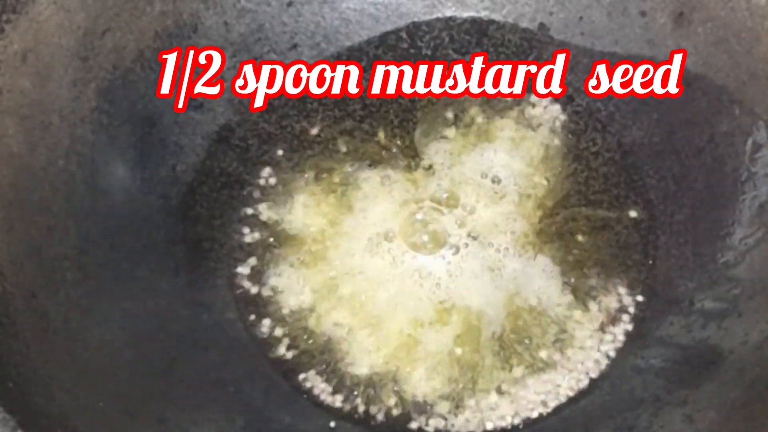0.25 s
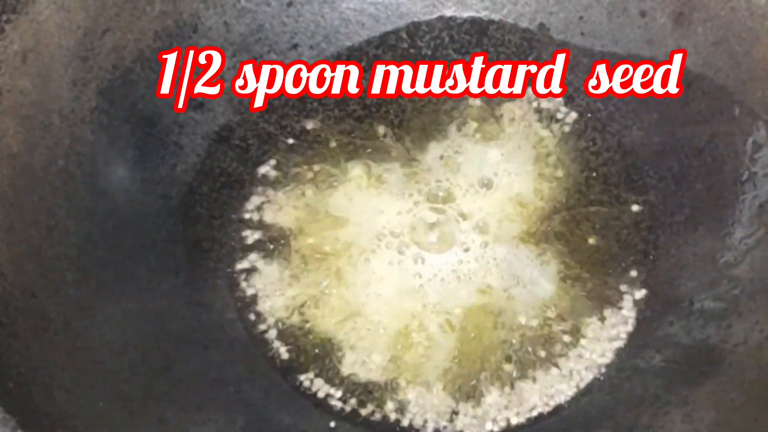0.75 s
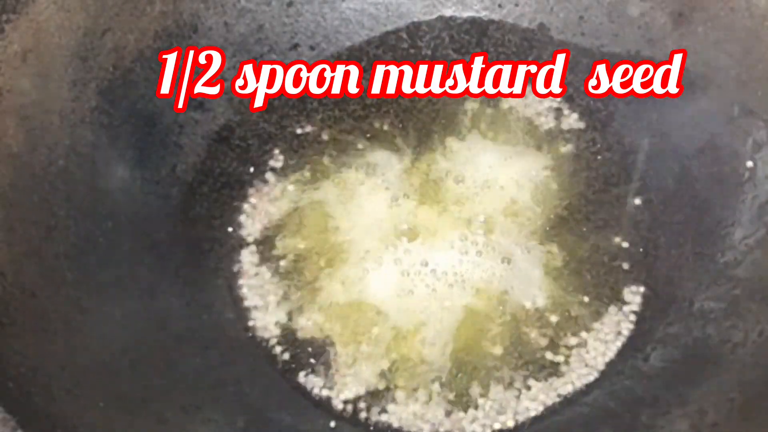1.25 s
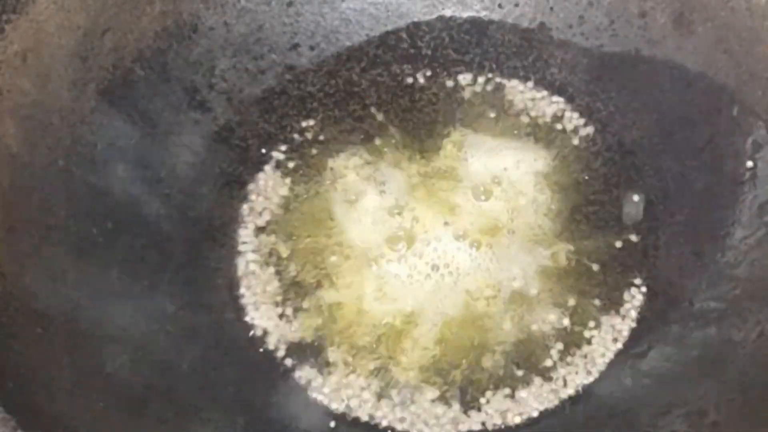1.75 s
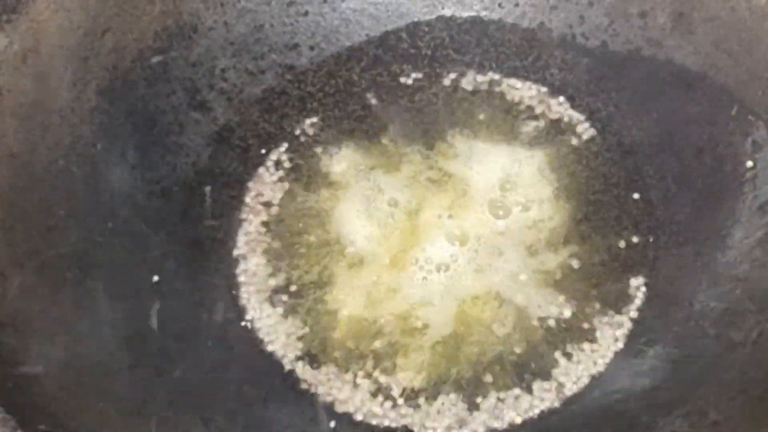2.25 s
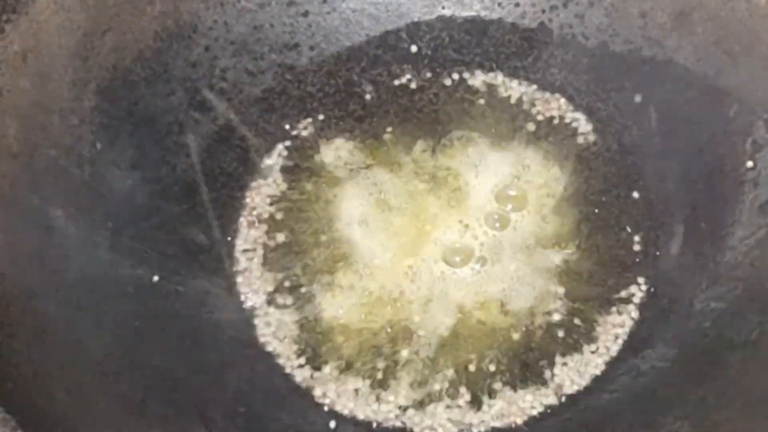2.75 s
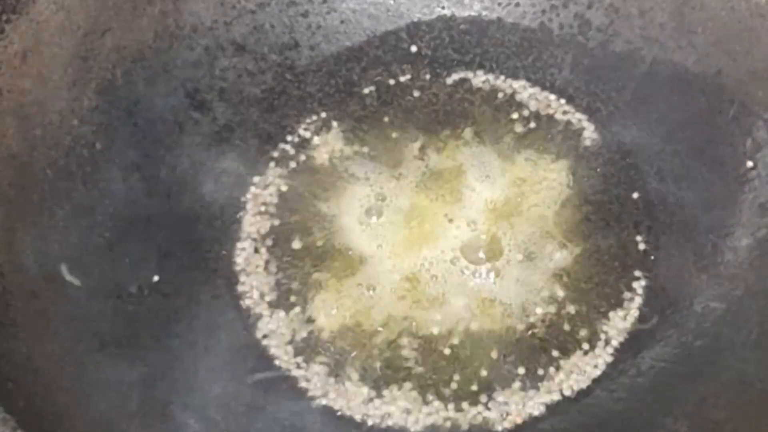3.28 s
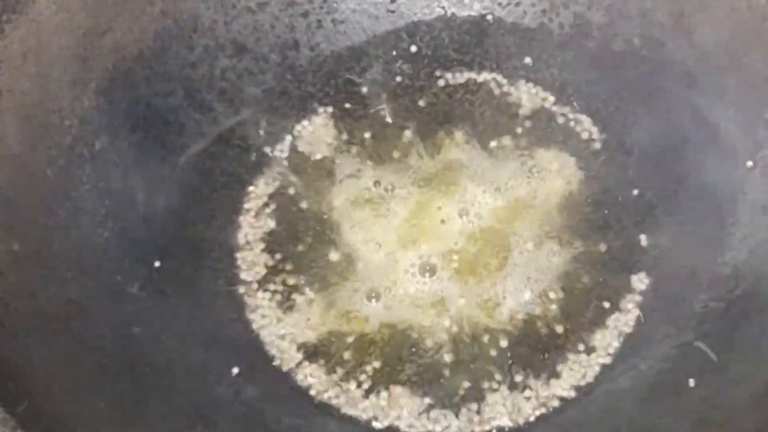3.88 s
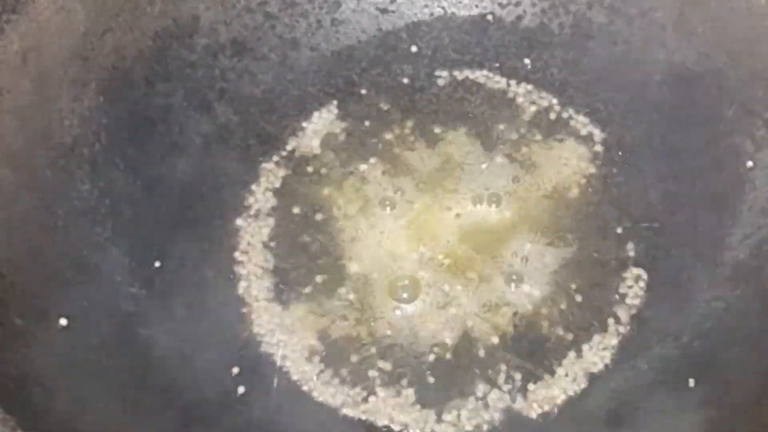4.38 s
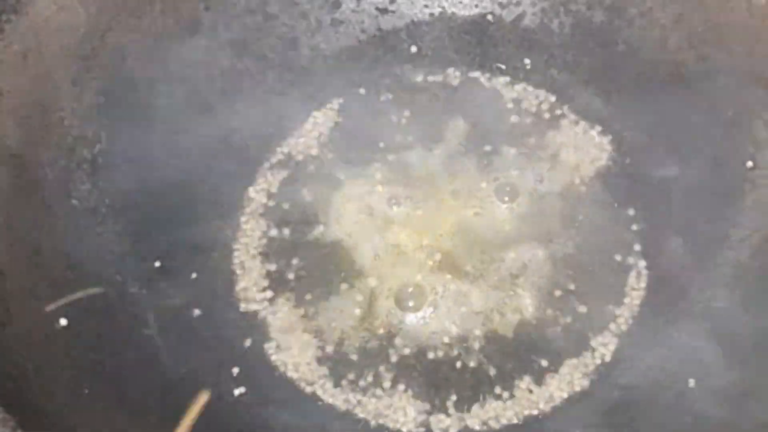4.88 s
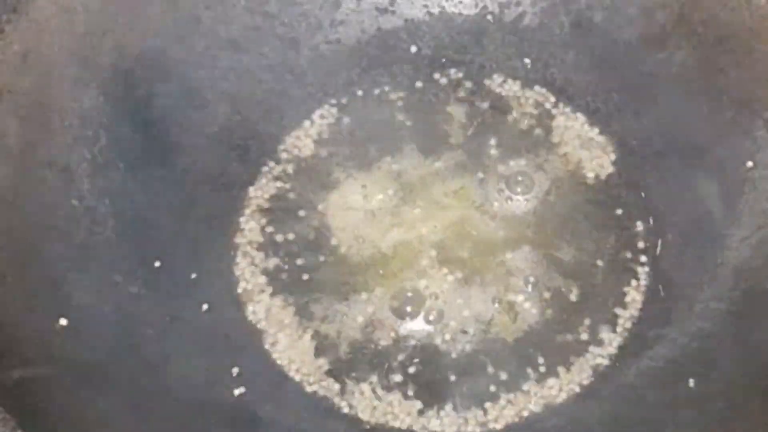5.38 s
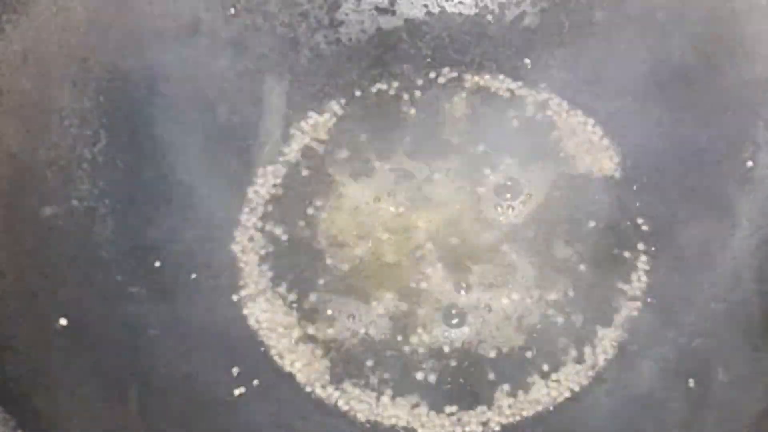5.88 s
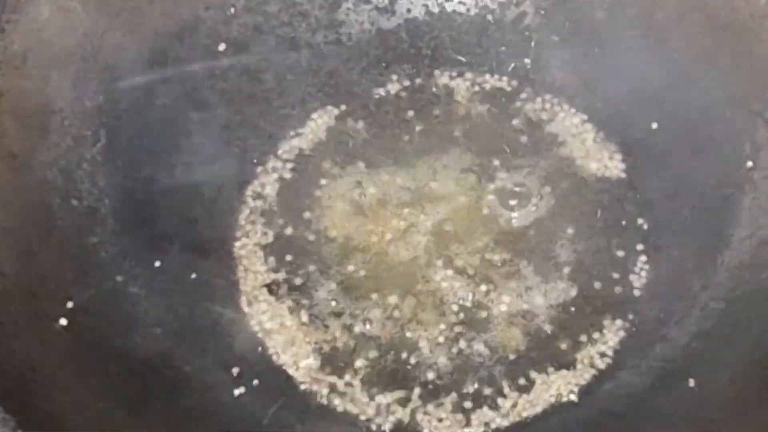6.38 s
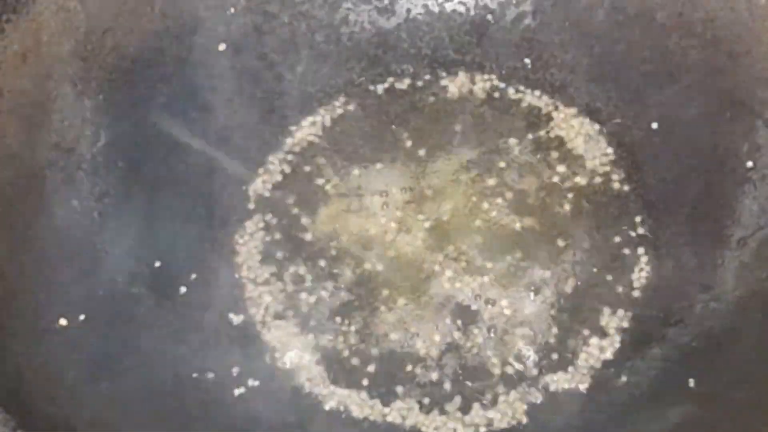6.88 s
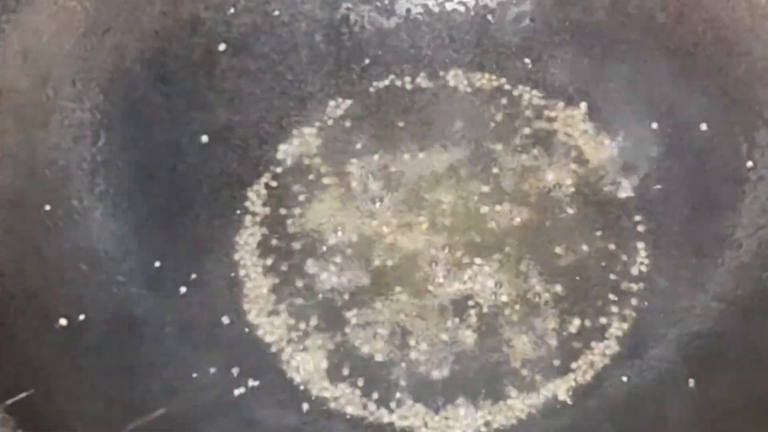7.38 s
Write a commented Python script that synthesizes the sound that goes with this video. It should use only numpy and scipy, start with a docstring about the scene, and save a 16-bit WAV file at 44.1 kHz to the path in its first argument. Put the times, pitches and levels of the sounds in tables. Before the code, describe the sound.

Close, dry seed pops build from a few snaps to rapid crackling in a sizzling steel wok, with a flame rumbling and a cricket trilling.

```python
"""Mustard seeds bursting in hot oil

Over a rumbling gas flame, shaped noise seethes in a steel wok; first a few dull resonant bubbles are heard,
then a dense sharp crackle: every seed is a ragged pulse with a thud, an echo off the wok and a short spray.
A few flying drops tap the microphone as decaying pulses with a slow swing. Behind it a cricket, pulsed
narrow-band noise, trills without a pause, and the cookware is knocked lightly twice, ringing as damped modes."""
import sys
import numpy as np
from scipy import signal
from scipy.fft import rfft, irfft, next_fast_len
from scipy.io import wavfile
from scipy.ndimage import uniform_filter1d

SR = 44100
rng = np.random.default_rng(int(sys.argv[2]) if len(sys.argv) > 2 else 0)


def dump_mix(stems):
    """Bounce the given channels to the path in sys.argv[1] as a 16-bit WAV at rate SR."""
    frames = np.atleast_2d(stems).T  # one column per channel
    limited = np.clip(frames, -1, 1)  # hard clip at full scale
    pcm = np.round(limited * 32767).astype(np.int16)
    wavfile.write(sys.argv[1], SR, pcm)


N = 336906
TIME = np.arange(N) / SR


def from_db(db):
    """Level law: decibels to amplitude gain."""
    return 10 ** (np.asarray(db) / 20)


def rms_one(x):
    """Normalisation of power: scale to rms 1."""
    return x / np.sqrt(np.mean(x ** 2) + 1e-20)


def curve(rows):
    """Linear interpolation of a (t/s, value) table at every sample."""
    s, values = np.transpose(rows)
    return np.interp(TIME, s, values)


def at_hz(points, hz):
    """Interpolation of a (f/Hz, value) table on a log-frequency axis."""
    point_hz, values = np.transpose(points)
    return np.interp(np.log(hz + 1), np.log(point_hz), values)


def add(out, s, sound):
    """Superposition: mix a sound in at time s."""
    i = max(round(s * SR), 0)
    out[..., i:i + sound.shape[-1]] += sound[..., :max(N - i, 0)]


def seconds(length_s_divisor):
    """Time axis of a short event lasting 1 / divisor s."""
    return np.arange(SR // length_s_divisor) / SR


def pan(left_db):
    """Intensity stereophony: two channel gains at equal power, the left stronger by left_db."""
    return rms_one(from_db([[left_db / 2], [-left_db / 2]]))


def drift(rate_hz):
    """Low-pass noise: slow chance fluctuation with spread 1, drawn at every 40th sample."""
    r = np.exp(-80 * np.pi * rate_hz / SR)
    white = rng.standard_normal(N // 40 + 2002)
    slow = signal.lfilter([1], [1, -2 * r, r * r], white)[2000:]   # skip the filter's start
    return np.interp(np.arange(N) / 40, np.arange(len(slow)), rms_one(slow))


def colour(x, spectrum):
    """Minimum-phase filtering: a causal response with the given spectrum, found by folding the cepstrum."""
    size = next_fast_len(N + SR // 2, real=True) // 2 * 2
    gain = from_db(at_hz(spectrum, np.fft.rfftfreq(size, 1 / SR)))
    cepstrum = irfft(np.log(gain), size)
    cepstrum[1:size // 2] *= 2
    cepstrum[size // 2 + 1:] = 0
    return irfft(rfft(x, size) * np.exp(rfft(cepstrum)), size)[..., :N]


# correlation of the two channels in the steady sounds: f/Hz, correlation (-1 to 1)
CHANNEL_CORRELATION = [(60, 0.75), (130, 0.94), (290, 0.81), (640, 0.32), (1400, -0.56), (3100, 0.33),
                       (7000, 0.057)]


def noise(spectrum):
    """Partial coherence: stereo noise of rms 1, mixed from mid and side to the correlation of each pitch."""
    size = next_fast_len(N, real=True)
    hz = np.fft.rfftfreq(size, 1 / SR)
    mid, side = rfft(rng.standard_normal((2, size)))
    alike = np.clip(at_hz(CHANNEL_CORRELATION, hz), -1, 1)
    both = np.sqrt(1 + alike) * mid + np.sqrt(1 - alike) * side * [[1], [-1]]
    # soft skirts beyond the ends of the table
    upper_skirt = 1 / (1 + (hz / spectrum[-1][0] / 1.2) ** 6)
    lower_skirt = 1 / (1 + (spectrum[0][0] / 1.2 / (hz + 1)) ** 6)
    shape = upper_skirt * lower_skirt * from_db(at_hz(spectrum, hz))
    return rms_one(irfft(both * shape, size)[:, :N])


def resonate(x, hz, q):
    """Second-order resonance with gain 1 on top."""
    w = 2 * np.pi * min(hz, SR / 3) / SR
    a = np.sin(w) / (2 * q)
    return signal.lfilter([a, 0, -a], [1 + a, -2 * np.cos(w), 1 - a], x)


def low_pass(x, hz):
    """Second-order low-pass, kept below the Nyquist frequency."""
    return signal.lfilter(*signal.butter(2, min(hz, SR * .45), fs=SR), x)


def unit_energy(x):
    """Normalisation of energy: scale a stereo event to a mean channel energy of 1."""
    return x / np.sqrt(np.sum(x ** 2) / 2)


def dying(t, first_s, linger_db, linger_s):
    """Double-slope decay: a quick one followed by the fainter, longer one of the kitchen."""
    return np.sqrt(np.exp(-2 * t / first_s) + from_db(2 * linger_db) * np.exp(-2 * t / linger_s))


def snap(t, snap_s=0.00011, scatter_db=-8.0, scatter_s=0.0018, own=0.8):
    """Impulsive source: a short ragged pressure pulse, later at the right port, then scattering in the bowl."""
    white = rng.standard_normal((5, len(t)))
    shell = (white[0] + own * white[1:3]) * np.exp(-t / snap_s)   # own: share private to each channel
    shell[:, 0] += 1.5   # the husk splits at once
    shell[1] = np.roll(shell[1], shift=2)
    scatter = white[3:] * np.exp(-t / scatter_s) / np.sqrt(scatter_s * SR / 2)
    return shell / np.linalg.norm(shell, axis=1, keepdims=True) + from_db(scatter_db) * scatter


def burst(x, hz, q=1.0, crack_db=-20.0, reach=2.32):
    """Broad resonance around the pitch; the top treble grows as the fourth power of pitch. Energy 1."""
    body = low_pass(resonate(x, hz, q * np.sqrt(4000 / hz)), reach * hz)
    crack = from_db(crack_db) * (hz / 8000) ** 4 * resonate(x, 14000, 0.62)
    return unit_energy(body + crack)


# spectrum of the flame's rumble: f/Hz, relative level/dB per Hz
FLAME_SPECTRUM = [(20, -12), (32, -10), (45, -8.5), (60, -5), (85, -3), (100, 3.5), (122, -1), (143, 3.5),
                  (170, -11.5), (205, -11.5), (237, -7), (280, -15.5), (325, -11.5), (370, -18.5),
                  (450, -22.5), (620, -23.5)]
# boom of the gas flame under the wok: t/s, level/dB
BOOM_LEVEL = [(0,-34),(.28,-51),(.9,-50),(1.1,-41.5),(2.3,-42.5),(2.72,-39.5),(2.85,-32),(2.98,-47),(3.8,-49.5),(4.09,-36.5),(4.3,-47),(5.4,-45.5),(5.6,-36.5),(5.75,-50),(6.4,-43),(7.13,-51),(7.43,-36.5),(7.62,-55)]
# rumble of the gas flame, before the common rumble gain: t/s, level/dB
RUMBLE_LEVEL = [(0,-41),(.85,-41),(1.3,-38.5),(2.7,-40.5),(3.08,-40),(3.45,-45.5),(3.8,-46),(4.28,-43),(4.4,-45.5),(7.05,-47.5),(7.64,-44.5)]


def flame(rumble_db=1.0, boom_hz=73, boom_q=8.3):
    """Turbulence noise, and a cavity resonance that swells and sinks in the gap under the wok."""
    rumble = from_db(curve(RUMBLE_LEVEL) + rumble_db) * noise(FLAME_SPECTRUM)
    swing = resonate(rng.standard_normal(N), boom_hz, boom_q)
    swing = rms_one(resonate(swing, boom_hz, boom_q / 3))
    power = uniform_filter1d(swing ** 2, size=SR // 8)
    boom = swing / np.sqrt(power + .05)   # evens out the chance swells
    return (rumble + from_db(curve(BOOM_LEVEL)) * boom) * pan(1.2)


# pulse rate of the cricket: t/s, rate/(pulses per s)
TRILL_RATE = [(0, 12.85), (.6, 13.2), (1.1, 12.7), (1.6, 12.5), (2.2, 13.3), (3.1, 12.9), (3.9, 13.42),
              (5, 13.2), (6, 13.3), (6.8, 13.5), (7.6, 12.75)]
# narrow band of the cricket: f/Hz, relative level/dB per Hz
CRICKET_SPECTRUM = [(6000, -32), (6850, -22.5), (7200, -2), (7410, -0.5), (7580, 6.5), (7760, -4),
                    (8050, -12), (8900, -42)]


def cricket(level_db=-39.5, depth_db=5.0):
    """Amplitude modulation: a high pulsed trill of uneven strength, smeared by the walls into a narrow band."""
    turns = np.cumsum(curve(TRILL_RATE)) / SR - .45
    uneven_db = .9 * drift(6)
    pulse_db = depth_db * np.cos(2 * np.pi * turns)
    return from_db(level_db + uneven_db + pulse_db) * noise(CRICKET_SPECTRUM) * pan(-0.8)


def crackle(per_s, spread_db):
    """Poisson-like impulse noise: countless tiny bubbles collapse at random; rms 1."""
    sizes = from_db(spread_db * np.minimum(rng.exponential(1, N), 4))
    happens = rng.random(N) < per_s / SR
    return rms_one(sizes * happens * rng.standard_normal((2, N)))


# colours of the frying oil, middle range and top: f/Hz, relative level/dB per Hz
SEETHE_SPECTRUM = [(250, -11), (450, 5.5), (800, 7.5), (1400, 6.5), (2200, 4.5), (3400, -6), (5500, -17.5),
                   (9000, -20)]
FIZZ_SPECTRUM = [(1500, -5), (3300, 1), (5200, 0.5), (7000, 1), (9500, -12), (12000, -1), (14500, -1),
                 (16000, -3)]
# strength of the seething and of the fizz, before the random flicker: t/s, level/dB
SEETHE_LEVEL = [(0,-53.5),(1.1,-51.5),(2,-48.5),(2.35,-52),(2.65,-47.5),(3.3,-56),(3.8,-52.5),(4.1,-46),(4.7,-44.5),(5.1,-50),(6.3,-55.5),(7.3,-64),(7.64,-55.5)]
FIZZ_LEVEL = [(0,-53),(.7,-57.5),(1.1,-53),(2.6,-51),(3.3,-52),(3.8,-50.5),(4.15,-46.5),(4.65,-44.5),(5.35,-50),(6.3,-47.5),(6.65,-53),(7.1,-53.5),(7.64,-51)]


def oil():
    """Summed random collapses: the foam seethes in the middle and fizzes on top, partly as single grains."""
    seethe_grains = rms_one(colour(crackle(900, 2.4), SEETHE_SPECTRUM))
    fizz_grains = rms_one(colour(crackle(500, 3.9), FIZZ_SPECTRUM))
    seethe = noise(SEETHE_SPECTRUM) + from_db(-9.5) * seethe_grains
    fizz = noise(FIZZ_SPECTRUM) + from_db(-6.5) * fizz_grains
    flicker_db = drift(14)   # shared by both
    seethe *= from_db(curve(SEETHE_LEVEL) + flicker_db) * pan(3.5)
    fizz *= from_db(curve(FIZZ_LEVEL) + flicker_db) * pan(1.5)
    return seethe + fizz


# steam squeezing out of the foam: middle t/s, half length/s, f/Hz, level/dB
STEAM_SPURTS = [(0.11, 0.089, 2830, -48.5), (0.366, 0.019, 2850, -50), (.68, 0.091, 675, -54.5),
                (1.3, 0.4, 1175, -57.5), (1.6, 0.11, 1010, -49), (1.815, 0.033, 1850, -48),
                (1.05, .025, 4600, -49), (2.102, 0.1, 1080, -58), (5.469, 0.013, 3350, -35.5),
                (7.537, 0.013, 3700, -30)]


def spurts(q=5.9):
    """Resonant jet noise: soft, narrow hisses under a Gaussian swell."""
    out, t = np.zeros((2, N)), seconds(2)
    for s, half_s, hz, level_db in STEAM_SPURTS:
        start = max(s - .25, 0)
        hiss = resonate(rng.standard_normal((2, len(t))), hz, q)
        hiss = rms_one(resonate(hiss, hz, q / 2))
        swell = np.exp(-((t + start - s) / half_s) ** 2)
        add(out, start, from_db(level_db) * hiss * swell)
    return out * pan(6.0)


def ticks(level_db=-10.0, spread_db=2.5, hz=6500):
    """Random thinning: faint ticks of tiny bubbles and droplets, more frequent and louder with harder fizz."""
    out, t = np.zeros((2, N)), seconds(100)
    fizz_re_db = curve(FIZZ_LEVEL) + 48   # relative to -48 dB
    for when, keep, size, pitch, side in rng.random((420, 5)):
        heat_db = fizz_re_db[int(when * N)]
        if keep < .6 * from_db(heat_db):
            gain = from_db(level_db + 2.2 * heat_db + spread_db * 2 * (size - 2.5))
            tick = burst(snap(t), hz * 2 ** (pitch - .5))   # within half an octave either way
            add(out, when * N / SR, gain * tick * pan(10 * side))
    return out


# modes of the cookware: f/Hz, relative level/dB, t60/s
COOKWARE_MODES = [(105, -8.5, .15), (234, -1, 0.35), (300, -9, 0.17), (356, -13, 0.088), (426, -3, 0.19),
                  (505, -5, .1), (608, -5.5, 0.15), (724, -18, 0.11), (816, -0.5, 0.25), (910, -10, .1),
                  (1066, -5, 0.088), (1260, -13, .07)]
# knocks on the cookware: t/s, relative level/dB, pitch stressed most f/Hz
COOKWARE_KNOCKS = [(5.548, -37, 690), (5.561, -35, 597), (5.574, -38.5, 300), (5.587, -40.5, 200),
                   (6.325, -43, 800), (6.347, -38, 800)]


def knocks(focus_db=3.5):
    """Modal excitation: soft knocks rattle the cookware and ring its modes, most those near the stressed pitch."""
    out, t = np.zeros((2, N)), seconds(2)
    for s, level_db, stress_hz in COOKWARE_KNOCKS:
        rattle = rms_one(resonate(rng.standard_normal((2, len(t))), stress_hz, 0.82))
        add(out, s, from_db(level_db) * rattle * np.exp(-t / 0.022))
        for hz, mode_db, t60 in COOKWARE_MODES:
            away_db = focus_db * np.log2(hz / stress_hz) ** 2   # loss by distance in octaves
            tone = np.sin(2 * np.pi * hz * t + rng.normal(0, 1.0, (2, 1)))
            envelope = np.exp(-np.log(1000) * t / t60) * (1 - np.exp(-t / 0.0008))
            add(out, s, from_db(level_db + mode_db - away_db) * tone * envelope)
    return out * pan(2.4)


# large steam bubbles in the foam: t/s, relative level/dB, lower pitch f/Hz
STEAM_BUBBLES = [(0.46,-14.5,3020),(.514,-4.5,2980),(0.836,-7,3000),(1.041,-10,3250),(1.0782,-11.5,2600),(1.3385,-4,2230),(1.431,-11.5,3000),(1.45,-13.5,3860),(1.744,-8,1880),(1.805,-12.5,1900),(1.9057,-2,2400),(2.14,-12.5,2920),(2.1759,-11,3340),(2.2923,-6,1800),(2.511,-9.5,2670),(2.6956,-.5,1650),(3.0184,-12.5,3070)]


def bubbles(level_db=1.5, second_db=1.0, tick_db=-7.5, room_db=-27.5, muffle_hz=10000, second_ratio=1.32):
    """Bubble resonance: a large bubble rings for a few cycles at two pitches, and the kitchen answers."""
    out, t = np.zeros((2, N)), seconds(6)
    q = 7.5
    for s, size_db, hz in STEAM_BUBBLES:
        second_hz = second_ratio * hz
        answer = rng.standard_normal((2, len(t))) * dying(t, first_s=0.015, linger_db=-22.0, linger_s=0.044)
        push = snap(t, snap_s=.00005, scatter_db=-8.5) + from_db(room_db) * answer
        ring = resonate(push, hz, q)
        ring -= from_db(second_db) * resonate(push, second_hz, q)
        ring += from_db(tick_db) * resonate(push, 5300, 0.37)
        ring = resonate(ring, np.sqrt(hz * second_hz), 0.63)
        ring = low_pass(ring, muffle_hz)   # the foam muffles the top
        add(out, s, from_db(size_db + level_db) * unit_energy(ring))
    return out * pan(5.3)


# oil drops landing on the microphone: t/s, relative tap level/dB
MICROPHONE_DROPS = [(5.225,-6),(5.815,-18),(5.843,-8),(5.9438,-16),(6.0337,-11),(6.3469,-16)]


def drops(tap_s=0.00011, swing_s=0.012, left_db=23.0, swing_hz=64.6, swing_db=-4.5, swing_growth=1.2):
    """Damped oscillation: a drop taps the left port and the diaphragm swings slowly, growing faster than the tap."""
    out, t = np.zeros(N), seconds(5)
    for s, tap_db in MICROPHONE_DROPS:
        tap = np.exp(-t / tap_s) - 0.27 * np.exp(-t / 0.0025)
        swing = np.sin(2 * np.pi * swing_hz * t) * np.exp(-t / swing_s)
        swing_gain = from_db(swing_db + swing_growth * tap_db)   # growth in dB per dB
        add(out, s, from_db(tap_db + 6.0) * tap + swing_gain * swing)
    return out * pan(left_db)


# heating of the oil: t/s, share of the full burst rate (0 to 1)
OIL_HEAT = [(1, .15), (2.2, 0.56), (4, 1)]


def small_pops(full_per_s=5, level_db=-8.5, spread_db=2.5, cool_db=-6, hz=7200, thud_db=-23, spray_db=-28.5):
    """Random thinning: lesser bursts, more frequent and stronger with heat; rows like those of SEED_POPS."""
    rows, chances_per_s = [], 20
    for when, keep, size, pitch in rng.random((chances_per_s * N // SR, 4)):
        s = when * N / SR
        heat = np.interp(s, *np.transpose(OIL_HEAT))
        if keep < heat * full_per_s / chances_per_s:
            pop_db = level_db + cool_db * (1 - heat) + spread_db * (2 * size - 1)
            rows.append((s, pop_db, hz * 2 ** (pitch - .5), thud_db, pop_db + spray_db))
    return rows


# the seeds that burst loudest:
# t/s, relative level/dB, f/Hz, thud re that level/dB, relative spray level/dB
SEED_POPS = [(.885,4,5900,-42.5,-31),(1.02,-5,4700,-27,-34),(1.041,-16,5160,-27,-38),(1.109,-9,5340,-16,-43),(1.2098,-13,7540,-23,-57),(1.7704,-7,5000,-22,-34),(1.8382,-6.5,5100,-11,-41),(2.3532,-13,5900,-22,-37),(2.4776,-7.5,6500,-18,-41),(2.5844,-3,5600,-14,-38),(2.5979,3,9800,-13.5,-24.5),
             (2.9196,10.5,9500,-29,-22.5),(2.9742,-1.5,8100,-16,-30.5),(3.026,-3,8900,-6.5,-23.5),(3.0674,-2,8200,-8.5,-26.5),(3.1469,-7,4750,-27,-36),(3.1583,-6,8600,-27,-40),(3.2248,-10,6200,-29,-42),(3.3959,-9,9700,-13,-33),(3.4343,6,7960,-19,-26.5),(3.5935,1,9500,-21,-27),(3.6493,8,7200,-36,-29),(3.7115,6.5,9700,-17,-21.5),(3.7558,2.5,6430,-8.5,-31),(3.8034,-5,6900,-15,-38),(3.8755,4,9000,-17,-23.5),(3.8865,4,10000,-18,-24.5),(3.9435,-2.5,8800,-29,-37),(3.995,3,10700,-13.5,-21),
             (4.0167,8.5,9300,-18,-22.5),(4.0864,2,7700,-8.5,-24),(4.1291,-1,6800,-0.5,-24.5),(4.1764,3,8800,-11.5,-21),(4.2206,-6,8800,-29,-19.5),(4.3183,.5,8750,-27,-23),(4.4176,6,8700,-28,-23),(4.5183,1,5800,-4,-25.5),(4.5794,11,8060,-22,-26),(4.6119,-1.5,6570,-16,-29),(4.6432,-3.5,7700,-29,-27),(4.7875,6,8250,-10,-22),(4.8042,-5,6800,-25,-27),(4.8232,9.5,9250,-10.5,-26),(4.9255,5.5,8900,-16,-24),(4.9475,13.5,6700,-17,-19.5),(4.9837,3,8300,-14,-32),
             (5.0169,-3,8900,-32,-30),(5.1078,1,7200,-31,-28),(5.154,2.5,8900,-21,-31),(5.1805,3,10300,-9.5,-21),(5.2251,-5,4400,-24,-30.5),(5.2688,13,7200,-19,-23),(5.3756,-3.5,8090,-24,-32),(5.382,7,8100,-33,-30),(5.44,8,8700,-25,-28),(5.4656,-3.5,4330,-19,-30.5),(5.4886,3,8600,-16,-28),(5.514,12.5,8300,-25,-21),(5.5666,-3,5740,-13,-29),(5.6851,-2,5470,-27,-29),(5.6996,6.5,9800,-12.5,-25.5),(5.7255,5,7100,-23,-27),(5.8033,3.5,9500,-23,-24),(5.815,8,8200,-17,-20.5),(5.8655,7.5,8300,-22,-27),(5.8898,8,7540,-34,-29),(5.9155,5,10360,-28,-29),(5.9442,8,8700,-8.5,-25),
             (6.0336,2,7500,-33,-25),(6.0545,-1,5930,-16,-27.5),(6.0711,3,8700,-21,-22.5),(6.118,-3.5,8300,-13,-29),(6.1758,-2.5,8900,-25,-32),(6.2484,9.5,9800,-13,-20.5),(6.2789,2.5,9600,-18,-24.5),(6.3455,6,6900,-8.5,-24),(6.4136,11,8100,-25,-25),(6.4532,1,5800,-16,-29),(6.4732,10.5,8700,-12.5,-22.5),(6.5578,-2,8100,-22,-27),(6.6508,5,9700,-34,-44),(6.6711,-1,7900,-13,-27),(6.6842,7,5640,-36,-29),(6.7419,0,6800,-25,-28),(6.769,8,7360,-18,-22),(6.7825,5,8550,-21,-32),(6.789,6.5,8800,-37,-39),(6.8493,7.5,10600,-37,-29),(6.888,-3,5500,-19,-29),(6.9059,14.5,7850,-18,-17),(6.992,2.5,8000,-21,-32),
             (7.0168,2,8150,-11.5,-28),(7.0561,4.5,8800,-21,-25),(7.1632,3,8000,-19,-39),(7.184,-19,6560,-28,-28.5),(7.2469,2,8450,-21,-29),(7.2653,-2,8300,-29,-24),(7.2935,7,8750,-13.5,-22),(7.3362,5,7700,-10.5,-22),(7.3918,7.5,6900,-42,-24.5),(7.4848,5.5,7400,-25,-21),(7.508,-2.5,7900,-9,-24),(7.5435,13,9900,-25,-20)]
# modes of the wok that the spray stirs: f/Hz, relative level/dB
SPRAY_MODES = [(602, 0), (811, -1), (985, -32), (3440, 6), (3635, -2), (4400, -5), (5878, -1.5)]
# wok and microphone colour on every burst: f/Hz, gain/dB
WOK_COLOUR = [(100, 9.5), (500, -3.5), (900, 0.5), (1300, -5), (2200, -4.5), (3400, -3.5), (5500, -2.5),
              (8000, -2), (9500, -5.5), (14500, 1), (16000, -3)]


def pops(snap_db=0.5, thud_db=-1.0, thud_hz=850, echo_s=0.0043, echo_db=-9.5, grain_db=2.5, modes_db=-4.0,
         mode_q=60, left_db=7.0, left_growth=0.28, left_scatter_db=2.5):
    """Impulse and reflection: a snap with a dull thud, an echo off the wok wall, then dying grainy spray."""
    hits, spray, t = np.zeros((2, N)), np.zeros((2, N)), seconds(5)
    spray_shape = dying(np.maximum(t - echo_s, 0), first_s=0.021, linger_db=-7.0, linger_s=0.039)
    spray_shape *= np.where(t > echo_s, .8, .45)
    thud = resonate((t == 0) * 1.0, thud_hz, 0.57) * np.ones((2, 1))
    thud /= np.linalg.norm(thud[0])
    for s, level_db, hz, body_db, tail_db in list(SEED_POPS) + small_pops():
        # bursts lie to the left, the louder ones more so, scattered over the pan
        pop_left_db = left_db + left_growth * level_db + left_scatter_db * rng.normal()
        hit = from_db(level_db + snap_db) * burst(snap(t), hz) * pan(pop_left_db)
        boom = rms_one(resonate(rng.standard_normal((2, len(t))), thud_hz, 1.1))
        boom *= from_db(-34.0) * np.exp(-t / 0.019)
        add(hits, s, hit + from_db(level_db + body_db + thud_db) * (thud + boom) * pan(9.3))
        add(hits, s + echo_s * (1 + 0.11 * rng.normal()), from_db(echo_db) * hit)
        grain_sizes = np.repeat(rng.standard_normal(len(t)), 30)[:len(t)]   # each held for 30 samples
        grains = from_db(grain_db * grain_sizes) * rng.standard_normal((2, len(t)))
        droplets = rms_one(burst(grains, hz, q=0.97, crack_db=-45.0))
        add(spray, s, from_db(tail_db) * droplets * spray_shape * pan(pop_left_db * 0.12))
    ringing = np.zeros((2, N))
    for hz, db in SPRAY_MODES:
        mode = resonate(spray, hz, mode_q * np.sqrt(hz / 3500))
        ringing += from_db(db + modes_db) * np.sqrt(9000 / hz) * mode
    return colour(hits + spray + ringing, WOK_COLOUR)


def scene():
    """Superposition of everything at the stove, from the background to the bursting seeds."""
    background = flame() + cricket() + oil()
    return background + spurts() + ticks() + knocks() + bubbles() + drops() + pops()


def record(dry, cutoff_hz=15900):
    """Soft saturation and low-pass: the sharpest peaks are rounded, the top is cut."""
    rounded = 1.05 * np.tanh(dry / 1.05)
    return signal.sosfilt(signal.ellip(10, .2, 80, cutoff_hz, fs=SR, output="sos"), rounded)


dry = scene()
out = record(dry)
dump_mix(out)
```